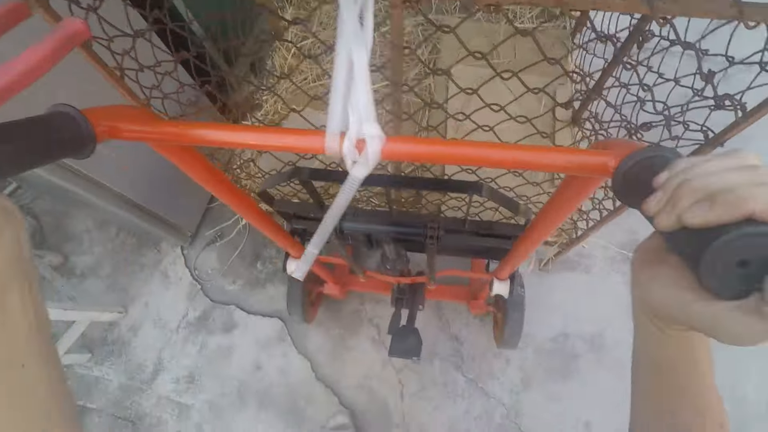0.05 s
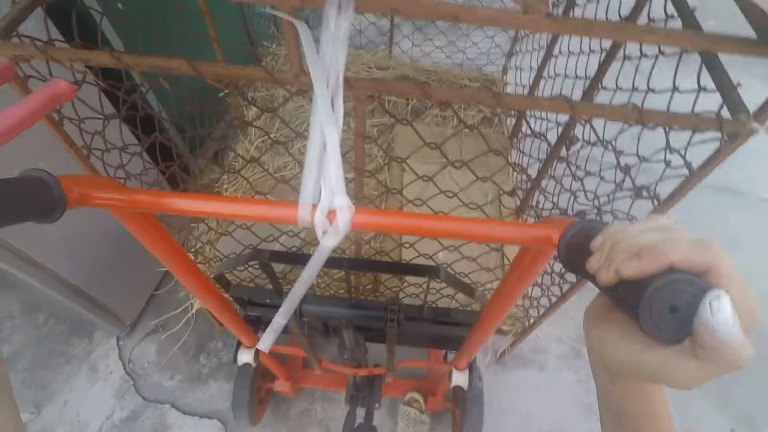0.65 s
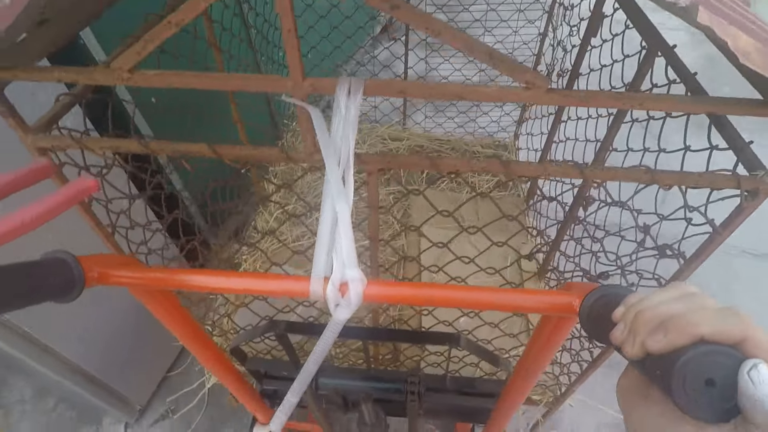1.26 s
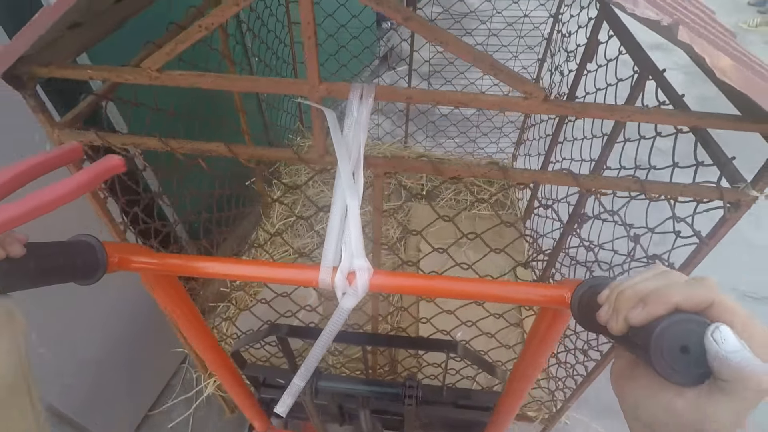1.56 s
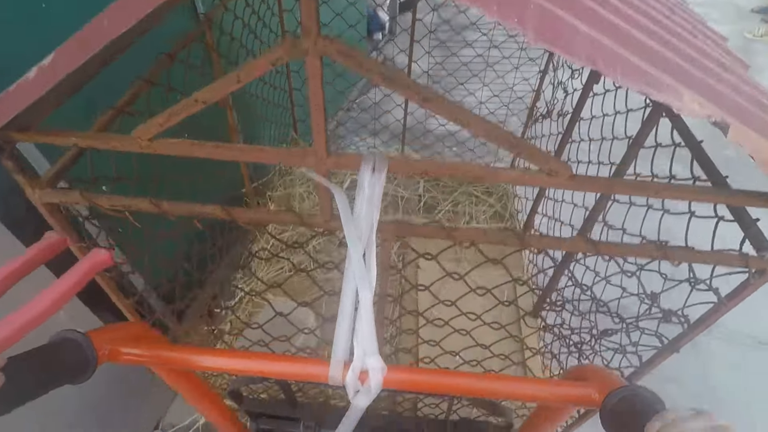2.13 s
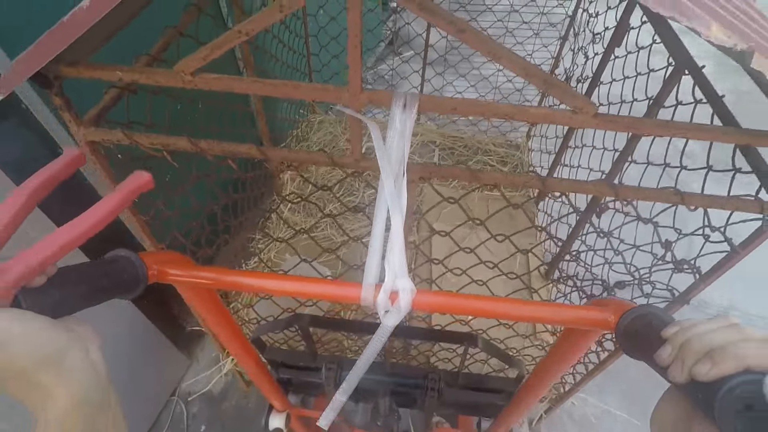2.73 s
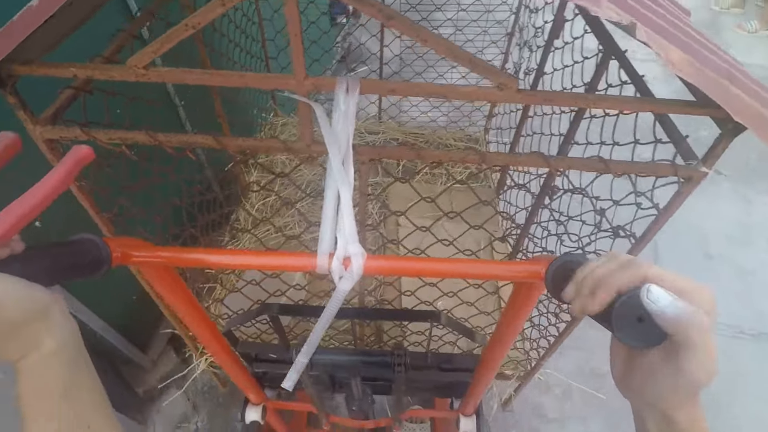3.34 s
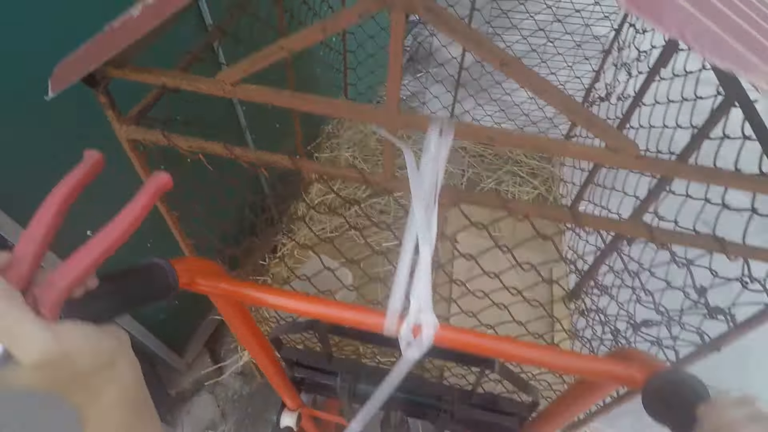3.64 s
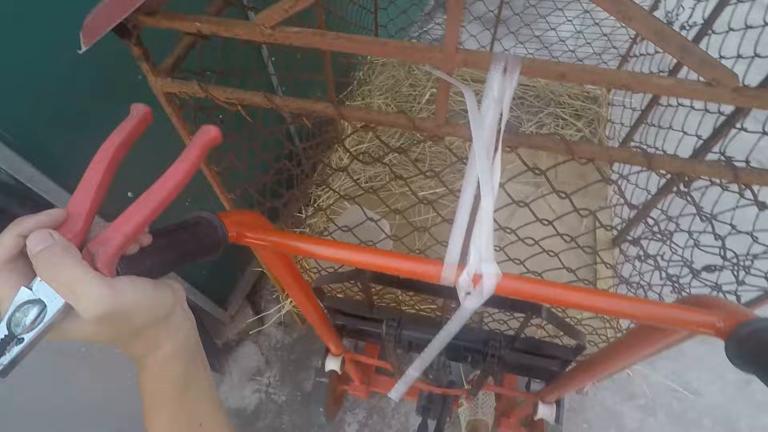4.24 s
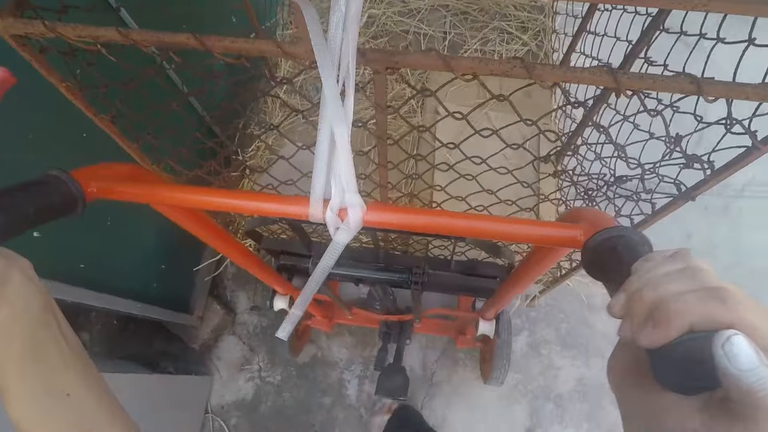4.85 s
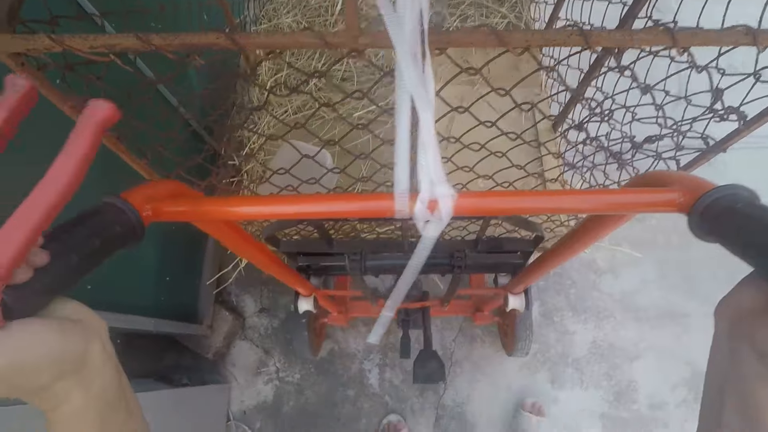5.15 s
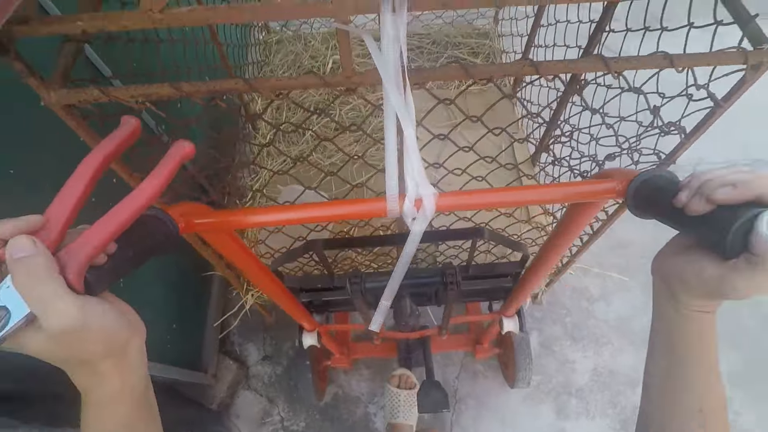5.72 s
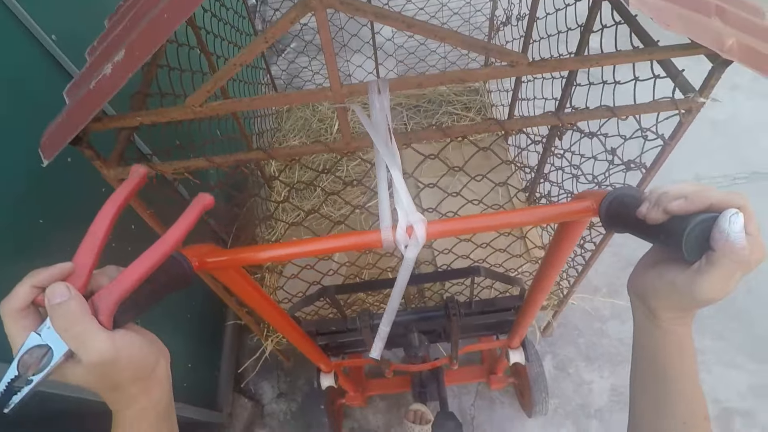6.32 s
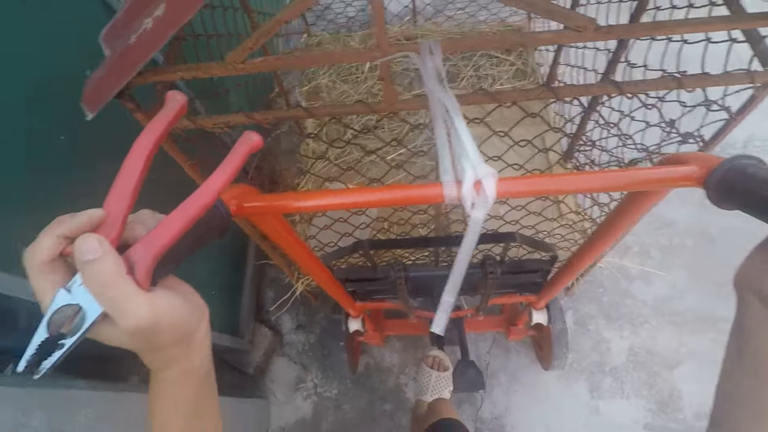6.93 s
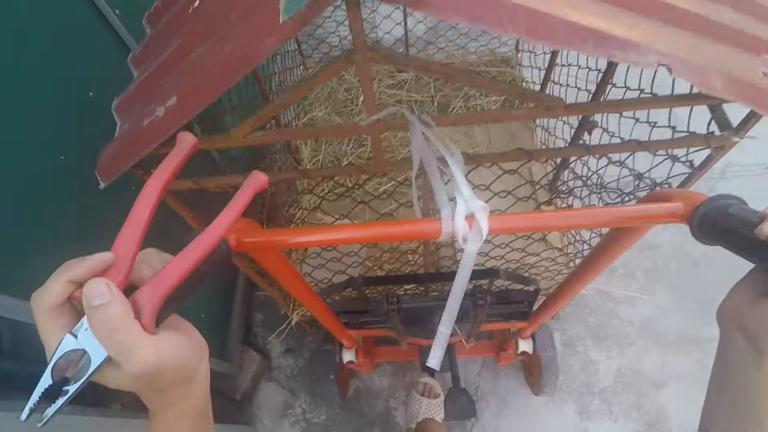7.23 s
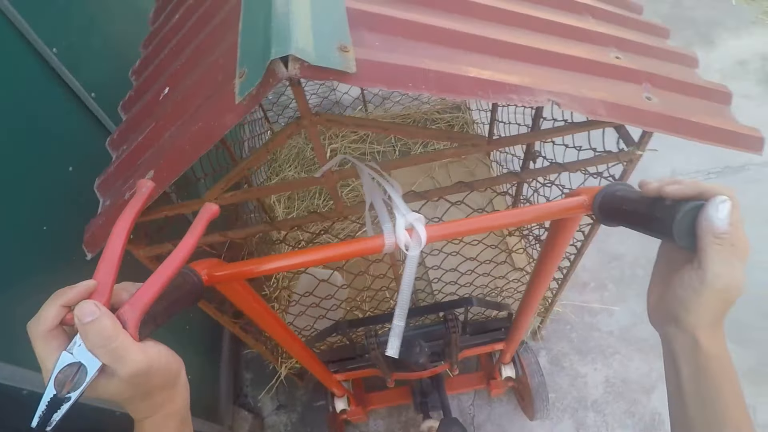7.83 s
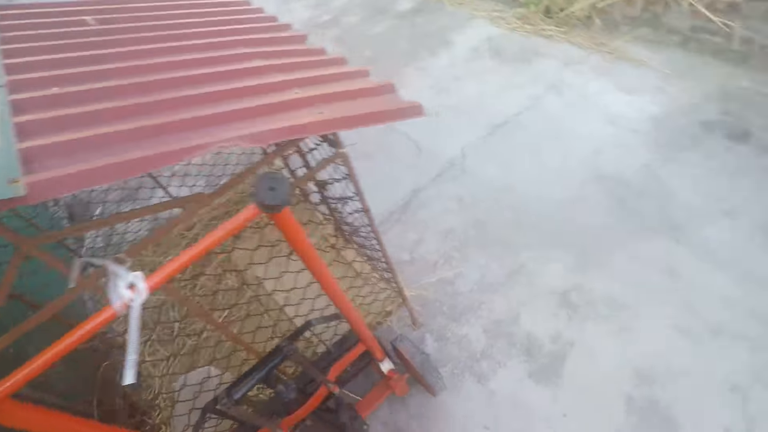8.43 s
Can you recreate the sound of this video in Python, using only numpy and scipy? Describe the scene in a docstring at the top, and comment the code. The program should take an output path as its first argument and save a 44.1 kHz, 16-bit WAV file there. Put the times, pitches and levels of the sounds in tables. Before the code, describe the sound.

Heard close from a body-worn microphone outdoors, small wheels rumble and crunch over rough concrete as a hand truck carries a rattling wire cage. Steel rubs, rings and squeaks early on, with a hollow tap on the microphone. The rolling swells and slackens among sandy scuffs and scattered clanks, breaks into low shuddering and a quick run of bumps, and dies away into a dull, quiet yard.

```python
"""Hand truck with a steel cage

A hand truck carries a steel and wire-mesh cage over rough concrete, surging with each stride, and stops.
Grit under the small wheels shakes the frame and sets the mesh buzzing; the load rattles, scrapes, clanks
and squeaks. A body-worn camera hears it close by through two ports and takes two small knocks."""
import sys
import numpy as np
from scipy import signal
from scipy.fft import rfft, irfft, next_fast_len
from scipy.io import wavfile
from scipy.ndimage import uniform_filter1d, minimum_filter1d, map_coordinates

SR = 44100
rng = np.random.default_rng(int(sys.argv[2]) if len(sys.argv) > 2 else 0)


def bounce(signal):
    """Save signal as a 16-bit WAV file at the path given by the first command-line argument."""
    frames = np.transpose(np.atleast_2d(signal))
    limited = np.clip(frames, -1, 1)
    pcm = np.round(limited * 32767).astype(np.int16)
    wavfile.write(sys.argv[1], SR, pcm)


N = 373527
T = np.arange(N) / SR
FFT_SIZE = 2 * next_fast_len(N // 2 + SR // 2)
FREQS = np.maximum(np.fft.rfftfreq(FFT_SIZE, 1 / SR), 1)

# Resonances of the truck's frame and the cage's rods. Each row: pitch in Hz, width in Hz, strength in dB.
FRAME_MODES = [(103.5, 57, 5), (135, 13.2, 5), (231, 16.3, 4.5), (267.2, 13.9, 8.5), (333, 11, -9.5),
               (368.7, 17.4, -7.5), (503, 12, -3.5)]
ROD_MODES = [(1530, 110, 3), (2310, 40, -2), (2400, 30, -1), (2815, 25, 0), (2885, 20, 3), (3015, 30, 6),
             (3235, 80, 8), (3380, 20, -6), (3710, 50, 3), (3830, 40, 6), (4000, 25, 7), (4585, 14, -1),
             (4985, 32, 0), (5486, 42, 6), (5730, 60, 1), (6270, 70, -4), (8463, 14, 2)]
# The colour of sliding grains. Each row: frequency in Hz, relative level in dB.
SWISH_COLOUR = [(300, -4), (800, -3.5), (1200, 6.5), (2400, 4.5), (3500, 6), (5000, 3), (8000, 6.5),
                (11000, -5), (15000, -21)]
# The load lurches on its tyres. Each row: start and length in seconds, thud and sway levels in dB.
LURCHES = [(2.257, 0.086, -50, -26), (3.93, 0.065, -51, -14.5), (4.343, 0.52, -24.5, -41),
           (5.3, 0.3, -48, -24), (5.802, 0.19, -22.5, -45), (7.324, 0.059, -24, -45)]


def undb(db):
    """Decibels to gain."""
    return 10 ** (np.asarray(db) / 20)


def unit(x):
    """Scale to rms 1."""
    return x / np.sqrt(np.mean(x ** 2) + 1e-18)


def over_hz(points):
    """Join (Hz, value) points on a log-frequency axis."""
    hz, value = np.transpose(points)
    return np.interp(np.log(FREQS), np.log(hz), value)


def body(x, colour, modes=(), ring_db=0):
    """Play x through a body with a broad colour and narrow resonances; the result has rms 1."""
    peaks = sum(undb(db + ring_db) / (1 + (2 * (FREQS - hz) / width) ** 2) for hz, width, db in modes)
    cepstrum = irfft(np.log(undb(over_hz(colour)) * (1 + peaks)))
    cepstrum[1:FFT_SIZE // 2] *= 2  # minimum phase: the ring follows the hit
    cepstrum[FFT_SIZE // 2 + 1:] = 0
    return unit(irfft(rfft(x, FFT_SIZE) * np.exp(rfft(cepstrum)))[..., :N])


def ringing(x, modes):
    """Play x through steep resonances alone."""
    out = 0
    for hz, width, db in modes:
        band = signal.butter(2, [hz - width / 2, hz + width / 2], "bandpass", fs=SR, output="sos")
        out = out + undb(db) * signal.sosfilt(band, x)
    return out


def impacts(rate, scatter_db):
    """Random tiny impacts, rate a second, of scattered size."""
    chance, sign, spread = rng.random(N), rng.choice([-1, 1], N), rng.standard_normal(N)
    return (chance < rate / SR) * sign * undb(scatter_db * np.minimum(spread, 2.5))


def spread_impacts(rate, scatter_db):
    """Impacts from all over the load, as the two ports hear them."""
    # How alike left and right are. Each row: frequency in Hz, likeness (clipped to a correlation).
    likeness = [(300, -1.5), (650, -1.255), (1300, -0.42), (2200, -0.34), (3000, 0.49), (3900, 0.87),
                (5500, 0.18), (7500, -0.12), (14000, -0.046)]
    correlation = np.clip(over_hz(likeness), -.98, .98)
    mid = rfft(unit(impacts(rate, scatter_db)), FFT_SIZE) * np.sqrt(1 + correlation)
    side = rfft(unit(impacts(rate, scatter_db)), FFT_SIZE) * np.sqrt(1 - correlation)
    return irfft(np.array([mid + side, mid - side]))[:, :N]


def wander(rate):
    """A smooth drift of rms 1 through rate random points a second."""
    knots = rng.standard_normal(4096)
    return unit(map_coordinates(knots, [T * rate], order=3, mode="wrap"))


def burst(t, length, rise, fall):
    """Envelope that rises, holds until length and dies away; times in seconds."""
    return (1 - np.exp(-t / rise)) * np.exp(-np.maximum(t - length, 0) / fall)


def fade(start, decay):
    """Full until start, then dying away; times in seconds."""
    return np.exp(-np.maximum(T - start, 0) / decay)


def add(out, start, x):
    """Mix x into out from start seconds on."""
    i = max(int(start * SR), 0)
    out[..., i:i + x.shape[-1]] += x[..., :N - i]


def yard(level_db=-33.5, auto_gain_start=8.07, auto_gain_db_per_s=13):
    """A faint, dull outdoor bed, brought up by the camera's automatic gain once the truck stands."""
    # The colour of the yard. Each row: frequency in Hz, relative level in dB.
    colour = [(20, -4.5), (30, 3), (55, -7.5), (100, -8.5), (200, -15), (360, -22.5), (900, -46),
              (1500, -46.5), (3500, -55.5), (8000, -60.5), (14000, -63.5)]
    auto_gain_db = auto_gain_db_per_s * np.maximum(T - auto_gain_start, 0)
    air = rng.standard_normal(N) + 0.043 * rng.standard_normal((2, N))
    return body(air, colour) * undb(level_db + auto_gain_db)


def case_knocks(port_lag=0.00068, right_db=-1):
    """Taps ring the camera's hollow case; the softer one is duller, and the right port hears both late."""
    # Taps on the case. Each row: start in seconds, peak in dB, treble tilt in dB per octave.
    knocks = [(0.7447, 0, 0), (5.4163, -10.5, -10)]
    # The colour of the case. Each row: frequency in Hz, relative level in dB.
    shell_colour = [(200, -20), (550, -14), (720, -6), (850, -6), (1050, -3), (1400, 0), (1600, -5),
                    (1800, -13), (2300, -16), (2800, -31), (3800, -28), (4600, -35), (9000, -39),
                    (14000, -50)]
    # Its resonances. Each row: pitch in Hz, width in Hz, strength in dB.
    shell_modes = [(700, 90, -5), (1500, 110, -4)]
    out, tap = np.zeros((2, N)), signal.unit_impulse(N)
    lowest_hz = shell_modes[0][0]
    for start, db, tilt_db in knocks:
        colour = [(hz, level + tilt_db * np.log2(max(hz / lowest_hz, 1))) for hz, level in shell_colour]
        ring = body(tap, colour, shell_modes)[:SR // 20]
        ring = ring / np.abs(ring).max()
        add(out[0], start, undb(db) * ring)
        add(out[1], start + port_lag, undb(db + right_db) * ring)
    return out


def scuffs():
    """Tyres, soles and load slide over sand and straw in a grainy swish; long slides have soft edges."""
    # The slides. Each row: start and length in seconds, level in dB, tilt in dB per octave.
    slides = [(1.291, 0.0011, -34, -4), (1.594, 0.018, -36.5, 1), (2.181, 0.019, -30, -3),
              (2.201, 0.011, -30, -1.5), (2.603, 0.61, -42, -1), (3.085, 0.02, -44, -1),
              (3.498, 0.14, -34.5, -4.5), (3.89, 0.03, -28.5, -2), (3.913, 0.006, -23.5, -13),
              (4.362, 0.1, -42, 2.5), (4.506, 0.042, -35, 4), (4.563, 0.24, -40.5, 1.5),
              (4.949, 0.021, -33.5, -3.5), (5.245, 0.023, -41, -2.5), (5.862, 0.069, -37.5, 0),
              (6.8, 0.0099, -44, 0), (6.812, 0.033, -32, -3.5), (7.127, 0.0027, -46, 7),
              (7.196, 0.07, -32.5, -6), (7.359, 0.091, -29, -5)]
    out, t = np.zeros((2, N)), T[:SR]
    grains = body(spread_impacts(rate=12000, scatter_db=-1.5), SWISH_COLOUR, ROD_MODES, ring_db=-33)
    octaves = np.log2(np.clip(np.fft.rfftfreq(len(t), 1 / SR), 500, None) / 3000)
    for start, length, db, tilt_db in slides:
        patch = grains[:, int(start * SR):][:, :len(t)]
        swish = unit(irfft(rfft(patch) * undb(tilt_db * octaves), len(t)))
        envelope = burst(t, length, rise=0.13 * length, fall=0.015 + 0.28 * length)
        add(out, start, undb(db) * swish * envelope)
    return out


def rod_rings(rise=0.0048, fall=0.02, port_radians=0.66):
    """A rubbed rod sings on for a moment at one pitch, jostled by the slips that feed it."""
    # The singing rods. Each row: start and length in seconds, pitch in Hz, level in dB.
    rings = [(0.186, 0.03, 3825, -36), (0.395, 0.035, 3235, -36), (0.485, 0.025, 3190, -41),
             (0.612, 0.078, 4005, -36), (0.768, 0.035, 3850, -47), (0.99, 0.027, 3015, -39),
             (1.0, 0.035, 1517, -38.5), (1.034, 0.062, 4585, -47), (1.55, 0.06, 2884, -32),
             (1.552, 0.04, 2812, -37), (1.602, 0.018, 3015, -34), (1.602, 0.028, 1544, -39)]
    out, t = np.zeros((2, N)), T[:SR // 3]
    flutter, jostle = undb(2.5 * wander(rate=130)), .3 * wander(rate=170)
    for start, length, hz, db in rings:
        span = int(start * SR) + np.arange(len(t))
        phase = 2 * np.pi * hz * t + jostle[span] + port_radians * np.array([[0], [1]])
        add(out, start, undb(db) * burst(t, length, rise, fall) * flutter[span] * np.sin(phase))
    return out


def scrapes(catch_db=0.6, groan_db=3):
    """Dense slips of wire on steel ring the rods and make the frame groan."""
    # Mesh slides on the frame. Each row: start and length in seconds, relative level in dB.
    slides = [(0.179, 0.03, -37), (0.29, 0.012, -38), (0.369, 0.08, -30), (0.459, 0.1, -34),
              (0.596, 0.025, -32), (0.636, 0.057, -32.5), (0.796, 0.029, -40), (0.825, 0.053, -34),
              (0.923, 0.07, -32), (1.029, 0.032, -36), (2.312, 0.11, -39), (2.932, 0.023, -34.5),
              (5.867, 0.004, -49), (5.936, 0.025, -49)]
    # The colour of rubbed steel. Each row: frequency in Hz, relative level in dB.
    rub_colour = [(1200, -0.5), (2400, -2), (3100, -2.5), (3900, -2), (4400, -4.5), (5500, -2.5),
                  (6300, -6.5), (9000, -8.5), (14000, -34)]
    # The frame's resonances under the mesh. Each row: pitch in Hz, width in Hz, strength in dB.
    groan_modes = [(348.3, 37, 0), (406, 35, 5), (487, 44, -8)]
    pressure = np.zeros(N)
    for start, length, db in slides:
        add(pressure, start, undb(db) * burst(T[:SR // 3], length, rise=0.0032, fall=0.0065))
    pressure *= undb(catch_db * wander(rate=120))  # the wires catch and let go
    slips = spread_impacts(rate=1300, scatter_db=3) + .6 * impacts(rate=1300, scatter_db=3)
    rods = body(slips * pressure, rub_colour, ROD_MODES, ring_db=4)
    groan = unit(ringing(slips.mean(axis=0) * pressure, groan_modes))
    return (rods + undb(groan_db) * groan) * np.sqrt(np.mean(pressure ** 2))


def squeaks(third_db=-6, catch_db=2, port_lag=.00004):
    """Steel sticks and slips on steel in short gliding tones, unsteady in pitch and strength."""
    # The squeaks. Each row: start and length in seconds, first and last pitch in Hz, level in dB,
    # overtones in dB against the tone, roughness as a share of the pitch.
    glides = [(1.117, 0.026, 2670, 2560, -28, -10, .022), (1.126, 0.044, 2490, 2380, -27.5, -19, .02),
              (1.464, 0.024, 6570, 6550, -36, -30, .004), (1.521, 0.022, 3000, 2900, -17.5, -34, .013),
              (1.53, 0.032, 2880, 2850, -16.5, -22, .012), (1.6, 0.012, 3030, 2950, -19, -26, .01),
              (5.929, 0.025, 3990, 4060, -35, -25, .016)]
    out, waver, catch = np.zeros((2, N)), wander(rate=600), wander(rate=220)
    for start, length, start_hz, end_hz, db, overtone_db, rough in glides:
        progress = np.linspace(0, 1, int(length * SR))
        span = int(start * SR) + np.arange(len(progress))
        hz = (start_hz + (end_hz - start_hz) * progress) * (1 + rough * waver[span])
        phase = 2 * np.pi * (np.cumsum(hz) / SR - np.outer([0, port_lag], hz))
        overtones = np.sin(2 * phase) + undb(third_db) * np.sin(3 * phase)
        tone = np.sin(phase) + undb(overtone_db) * overtones
        add(out, start, undb(db + catch_db * catch[span]) * np.sin(np.pi * progress) * tone)
    return out


def chinks(decay=0.0082, pitch_spread=0.0523, tick_gain=0.95, tick_decay=0.0058):
    """A tapped wire ticks and rings with a cluster of close, quickly damped modes."""
    # Wires tap each other. Each row: start in seconds, pitch in Hz, peak in dB.
    taps = [(1.392, 3050, -29), (1.502, 2980, -26), (1.646, 3370, -25), (1.729, 3100, -25),
            (1.833, 3500, -27), (1.846, 3200, -21), (1.929, 3330, -18.5), (1.952, 3300, -25),
            (2.712, 3310, -31), (4.527, 6000, -28), (4.784, 3360, -24), (5.868, 4020, -28)]
    out, t = np.zeros((2, N)), T[:SR // 12]
    for start, hz, db in taps:
        pitches = hz * (1 + pitch_spread * rng.standard_normal(12))
        shares = 1 + 0.46 * rng.standard_normal((2, 12))
        ring = unit(shares @ np.sin(2 * np.pi * np.outer(pitches, t + decay))) * np.exp(-t / decay)
        tick = uniform_filter1d(rng.standard_normal(ring.shape), size=3) * np.exp(-t / tick_decay)
        chink = ring + tick_gain * tick
        add(out, start, undb(db) * chink / np.abs(chink).max())
    return out


def clanks(crack_decay=0.0011):
    """The cage strikes the truck: a gritty crack, and steel modes that each blow excites differently."""
    # The blows. Each row: start in seconds, peak in dB.
    blows = [(1.29, -23), (2.196, -18), (2.203, -21), (2.942, -27), (2.947, -29), (3.565, -20.5),
             (3.901, -13.5), (3.91, -13), (3.916, -11.5), (6.818, -19.5), (6.825, -19.5), (7.368, -32),
             (7.408, -20), (7.424, -25)]
    # The ring of the struck cage. Each row: pitch in Hz, decay in seconds, relative level in dB.
    cage_modes = [(1200, 0.0052, -7), (1540, 0.007, -7), (2305, 0.012, -4.5), (2770, 0.0033, -3),
                  (2940, 0.0054, -3), (3340, .008, -4), (3430, 0.0055, 0), (3620, .01, -2),
                  (4020, .01, -1.5), (4600, 0.0053, -1), (5320, .004, -5), (6300, .003, -4),
                  (6800, .003, -3), (7700, 0.004, -2)]
    out, t = np.zeros((2, N)), T[:SR // 10]
    partials = [undb(db) * np.sin(2 * np.pi * hz * t) * np.exp(-t / decay) for hz, decay, db in cage_modes]
    grit = body(spread_impacts(rate=45000, scatter_db=10), SWISH_COLOUR)
    for start, db in blows:
        shared, left, right = rng.standard_normal((3, len(partials)))
        ring = (np.sign(shared) + np.array([left, right])) @ partials
        crack = grit[:, int(start * SR):][:, :len(t)] * np.exp(-t / crack_decay)
        clank = ring + crack
        add(out, start, undb(db) * clank / np.abs(clank).max())
    return out


def rattle(gain, scatter_db=2.5, count=1600):
    """Loose rods and wires tap at random; each tap rings at a slightly different pitch and place."""
    # The loose parts. Each row: pitch in Hz, its spread as a share, decay in seconds, taps a second,
    # relative level in dB.
    loose_parts = [(1535, .03, .006, 150, -8), (3330, .075, .0035, 175, -8.5)]
    out, t = np.zeros((2, N)), T[:SR // 24]
    for hz, spread, decay, rate, db in loose_parts:
        starts = np.cumsum(rng.exponential(1 / rate, count))
        envelope = burst(t, 0, rise=0.00076, fall=decay)
        for start, (detune, size, left, right) in zip(starts, rng.standard_normal((count, 4))):
            if start < T[-1]:
                phase = 2 * np.pi * hz * (1 + spread * detune) * t + np.array([[left], [right]]) / 2
                add(out, start, undb(db + scatter_db * min(size, 2)) * np.sin(phase) * envelope)
    return out * gain


def chatter(mesh_gain, grit_gain):
    """Wires buzz against each other and sand cracks under the tyres, both in uneven flurries."""
    # The colours of mesh and sand. Each row: frequency in Hz, relative level in dB.
    mesh_colour = [(400, 8.5), (800, 9.5), (1150, 7), (1350, 4), (1800, 4), (2200, -1), (2500, -5),
                   (2750, -6.5), (3250, -6.5), (3900, -7.5), (4400, -16.5), (7000, -59), (12000, -85)]
    grit_colour = [(1500, 6), (3000, 0), (4500, -3), (7000, 0.5), (8500, -3), (10000, -4.5), (11200, -12.5),
                   (13500, -16.5), (15000, -31.5)]
    flurry = wander(rate=25)
    mesh = body(spread_impacts(rate=4600, scatter_db=3), mesh_colour, ROD_MODES, ring_db=-10.5)
    grit = body(spread_impacts(rate=7000, scatter_db=4.2), grit_colour, ROD_MODES, ring_db=-19)
    return mesh * mesh_gain * undb(1.7 * flurry) + grit * grit_gain * undb(0.83 * flurry)


def judder(rise=0.015, fall=0.07, drift=0.0248, uneven_db=2):
    """A hard shove sets the loaded frame bouncing in two close modes, which beat into a dry pulsing."""
    # The shoves. Each row: start and length in seconds, level in dB.
    shoves = [(5.93, 0.47, -21), (6.735, 0.27, -17), (7.14, 0.36, -20.5)]
    # The frame's bounce. Each row: pitch in Hz, relative level in dB.
    bounce_modes = [(108, -2), (137, -0.5)]
    strength, swing = np.zeros((2, N))
    for start, length, db in shoves:
        add(strength, start, undb(db) * burst(T[:2 * SR], length, rise, fall))
    for hz, db in bounce_modes:
        phase = 2 * np.pi * np.cumsum(hz * (1 + drift * wander(rate=25))) / SR
        swing += undb(db + uneven_db * wander(rate=14)) * np.sin(phase)
    return unit(swing) * strength


def bumps(rise=0.0063):
    """Each ridge kicks the loaded frame, which swings briefly."""
    # The wheels drop over ridges. Each row: start in seconds, peak in dB, pitch in Hz, decay in seconds.
    ridges = [(0.079, -3.5, 194, 0.0036), (0.361, -8.5, 137.4, 0.095), (2.203, -9, 402, 0.0025),
              (2.242, -4.5, 261.6, 0.0024), (2.835, -13.5, 193, 0.021), (3.179, -11, 270, 0.0087),
              (3.9207, -4.5, 370, 0.0016), (6.285, -8, 274, 0.011), (6.735, 2, 223, 0.0092),
              (6.822, -5, 237, 0.0085), (6.873, -4.5, 215, 0.019), (6.962, -1.5, 233, 0.016),
              (7.025, -11, 246, 0.008), (7.083, -1, 225, 0.007), (7.147, -2, 227, 0.0074),
              (7.278, -6, 254, 0.008), (7.37, -10, 95, 0.041), (7.408, -21, 413, 0.025),
              (7.437, -4, 258, 0.01), (7.621, -16, 226, 0.021)]
    out, t = np.zeros(N), T[:SR // 4]
    for start, db, hz, decay in ridges:
        ring = np.sin(2 * np.pi * hz * t) * burst(t, 0, rise, decay)
        add(out, start, -undb(db) * ring / np.abs(ring).max())
    return out


def lurch(length):
    """The swell of one lurch of the load."""
    return burst(T[:SR], length, rise=0.018, fall=0.031)


def load_sway(walking, walk_db=-22.5, rest_db=-50, width=0.11):
    """The load sways with the walk, a deep wobble that stirs the air a little differently at each port."""
    # The colour of the sway. Each row: frequency in Hz, relative level in dB.
    colour = [(10, -12.5), (20, 10.5), (28, 10.5), (40, 3), (52, 6.5), (66, -2), (100, -77), (400, -108.5),
              (3000, -140)]
    gain = undb(walk_db) * walking + undb(rest_db)
    for start, length, _, db in LURCHES:
        add(gain, start, undb(db) * lurch(length))
    sway, stir = (body(impacts(rate=420, scatter_db=1.6), colour) * gain for _ in range(2))
    return sway + width * np.outer([1, -1], stir)


def tyre_thud(gain, walking, ease_db=-4):
    """The tyres thud on the concrete, harder in a lurch and softer after the last stride."""
    # The colour of the tyres. Each row: frequency in Hz, relative level in dB.
    colour = [(35, -25), (50, -2.5), (62, 12), (85, 5.5), (115, 2.5), (140, 0), (175, -10), (280, -21),
              (900, -94.5), (4000, -130)]
    gain = gain * undb(ease_db * (1 - walking))
    for start, length, db, _ in LURCHES:
        add(gain, start, undb(db) * lurch(length))
    return body(impacts(rate=600, scatter_db=-1), colour, FRAME_MODES, ring_db=-6) * gain


def hollow_boom(gain):
    """The loaded frame booms as it rolls at speed."""
    # Its hollow resonances. Each row: pitch in Hz, width in Hz, strength in dB.
    modes = [(227.2, 26.4, -9), (265.6, 24.2, -3)]
    return unit(ringing(impacts(rate=600, scatter_db=2.5), modes)) * gain


def frame_drone(gain):
    """Rough concrete drums on the wheels and sets the frame droning."""
    # The colour of the frame. Each row: frequency in Hz, relative level in dB.
    colour = [(70, -26), (125, -10), (175, 1.5), (255, -4), (310, -4), (390, -7), (480, -16), (600, -23),
              (780, -34), (1200, -62.5), (5000, -120)]
    return body(impacts(rate=1200, scatter_db=1), colour, FRAME_MODES) * gain


def motion(crawl=0.24):
    """Pushes speed the truck up and drag slows it to a crawl; gives speed (1 is brisk) and sand flow."""
    # Pushes on the handles. Each row: start, run-up, hold and coasting times in seconds, speed gained,
    # sand under the wheels in dB against that gain.
    pushes = [(0.0, 0.079, 0.37, 0.18, 0.52, 4.5), (.8, 0.055, 0.55, 0.3, 0.06, 21.5),
              (1.14, 0.8, 0.085, 0.33, 0.68, 6.5), (2.991, 0.17, 0.66, 0.13, 0.57, 6),
              (4.36, 0.41, 0.15, 0.37, 0.53, -0.5), (5.824, 0.17, 0.088, 0.29, 0.87, 2),
              (6.72, 0.13, 0.42, 0.046, 0.46, -9), (7.17, 0.23, 0.046, 0.14, 0.7, -29)]
    speed = sand = crawl
    for start, rise, held, coast, gained, sand_db in pushes:
        surge = gained * np.clip((T - start) / rise, 0, 1) * fade(start + rise + held, coast)
        speed = speed + surge
        sand = sand + surge * undb(sand_db)
    return speed, sand


def scene(left_lag=0.00014):
    """The pushes drive the rolling sounds; the low shaking reaches the left port late; the metal is wide."""
    speed, sand = motion()
    walking = fade(start=6.68, decay=0.06)  # the last stride
    rolling = fade(start=7.588, decay=0.2)  # the wheels come to rest
    drone = frame_drone(undb(-11) * speed ** 1.177 * rolling)
    thud = tyre_thud(undb(-19.5) * speed ** 0.31 * rolling, walking)
    sway = load_sway(walking)
    boom = hollow_boom(undb(-16) * speed ** 2.12 * rolling)
    left, right = drone + thud + sway + boom + bumps() + judder()
    low = np.array([np.interp(T - left_lag, T, left), right])
    mesh_gain = undb(-31.5) * speed ** 1.254 * rolling ** 2
    grit_gain = undb(-40.5) * sand ** 0.6 * rolling ** 3
    buzz = chatter(mesh_gain, grit_gain) + rattle(mesh_gain)
    metal = scrapes() + rod_rings() + squeaks() + chinks() + clanks()
    balance = undb([[-.5], [.5]])
    return (low + buzz + metal + scuffs() + case_knocks() + yard()) * balance


def record(dry, ceiling=.93, release_db_per_s=260, top_hz=14600):
    """The camera's limiter ducks just ahead of each loud peak and soon recovers; the top is cut."""
    window = SR // 300
    excess_db = 20 * np.log10(np.maximum(np.abs(dry).max(axis=0) / ceiling, 1))
    recovery = release_db_per_s * T
    held_db = np.maximum.accumulate(excess_db + recovery) - recovery
    gain = uniform_filter1d(minimum_filter1d(undb(-held_db), window), window)
    lowpass = signal.ellip(10, .1, 80, top_hz, fs=SR, output="sos")
    return signal.sosfilt(lowpass, dry * gain)


dry = scene()
out = record(dry)
bounce(out)
```